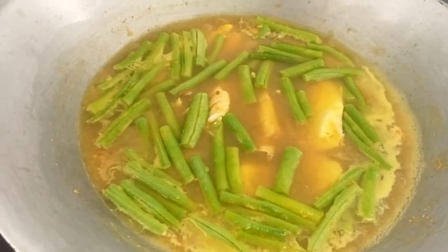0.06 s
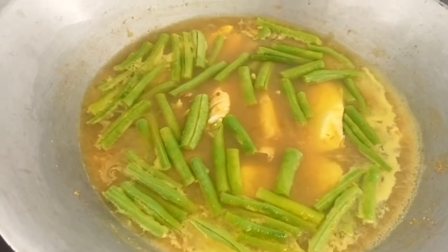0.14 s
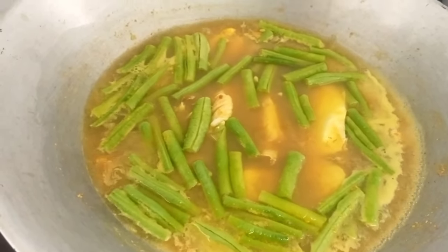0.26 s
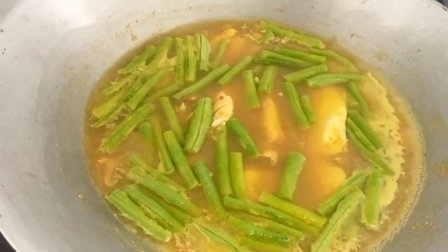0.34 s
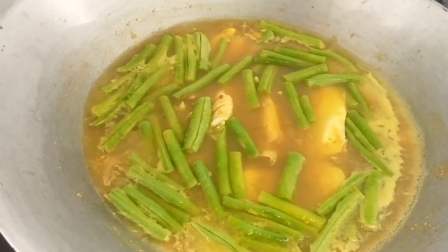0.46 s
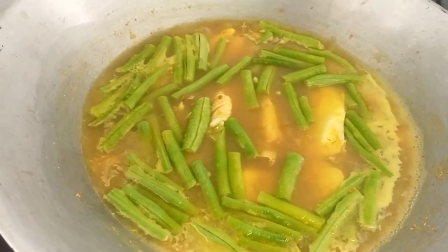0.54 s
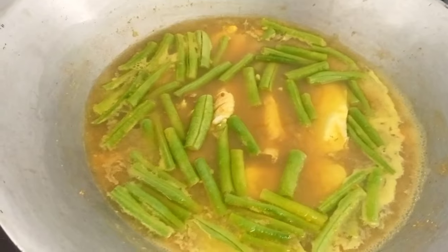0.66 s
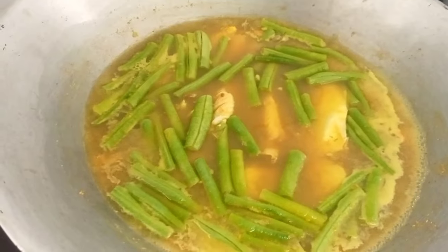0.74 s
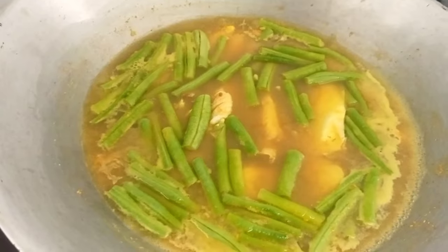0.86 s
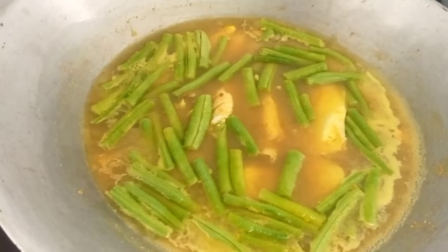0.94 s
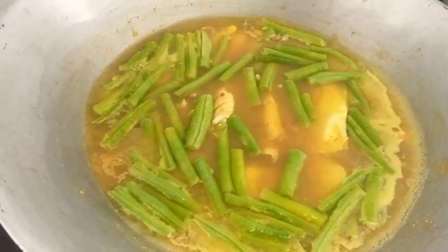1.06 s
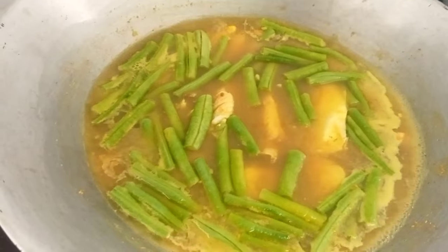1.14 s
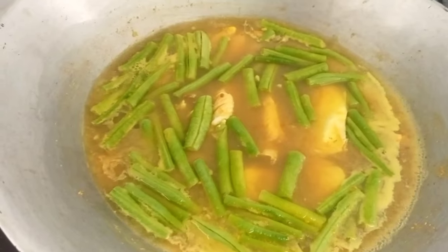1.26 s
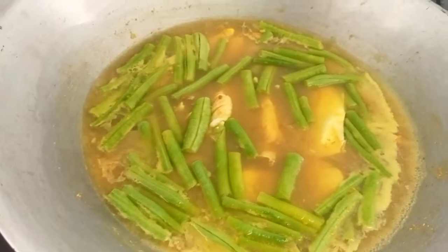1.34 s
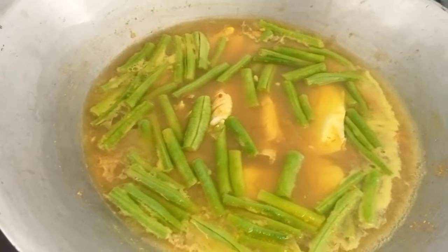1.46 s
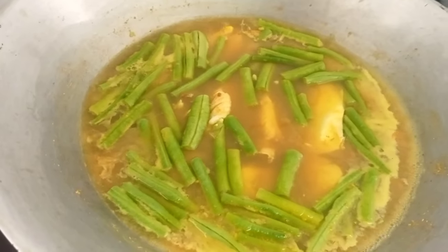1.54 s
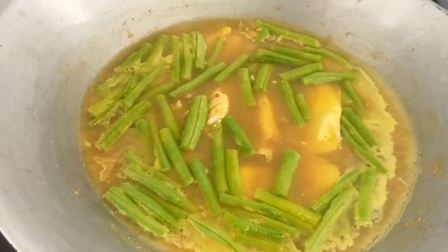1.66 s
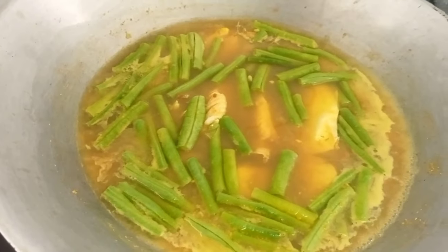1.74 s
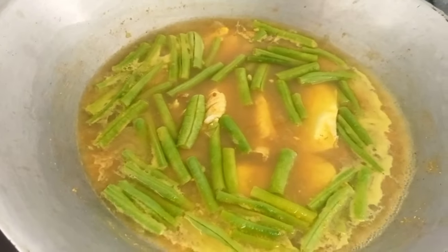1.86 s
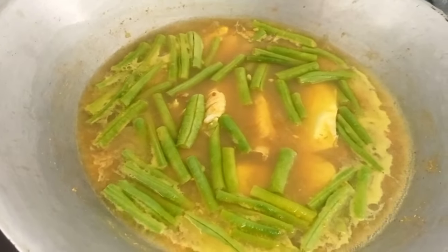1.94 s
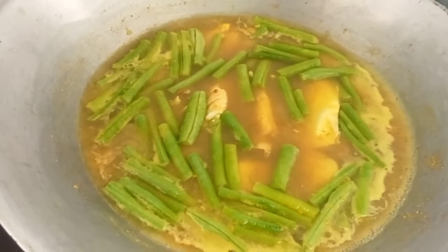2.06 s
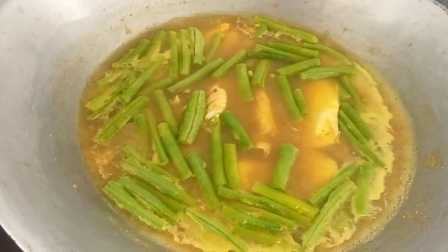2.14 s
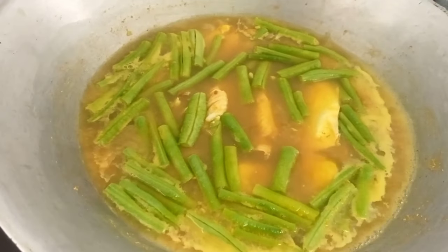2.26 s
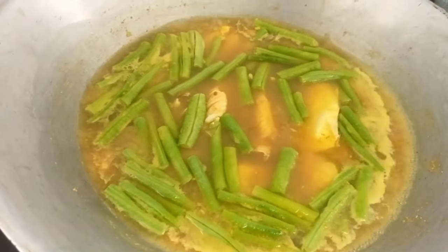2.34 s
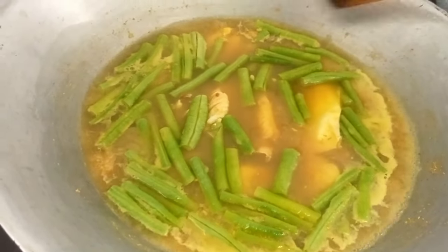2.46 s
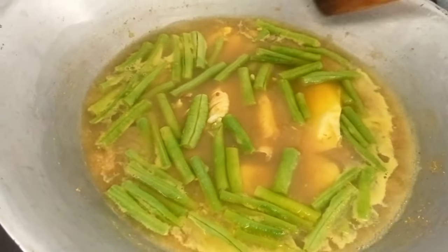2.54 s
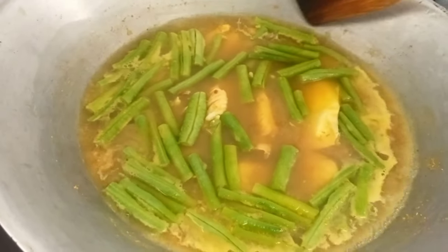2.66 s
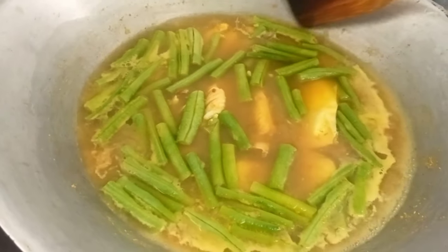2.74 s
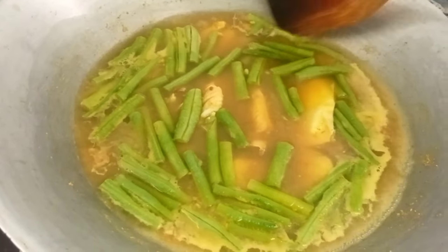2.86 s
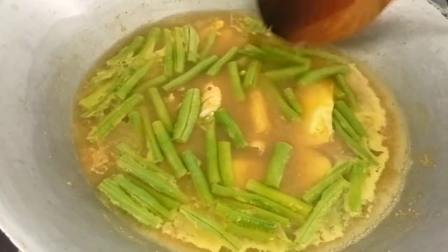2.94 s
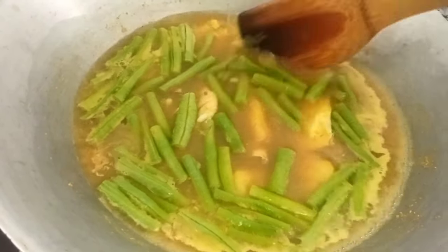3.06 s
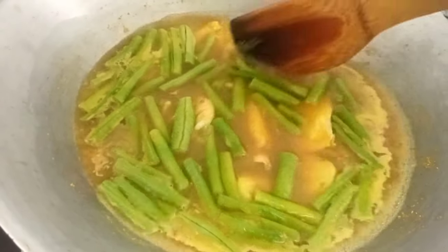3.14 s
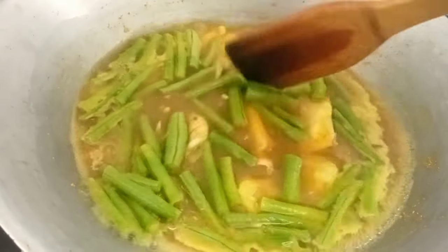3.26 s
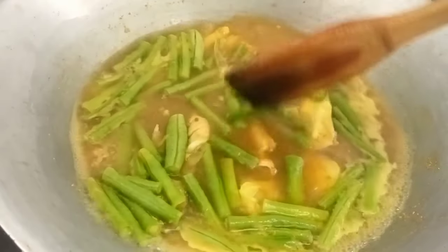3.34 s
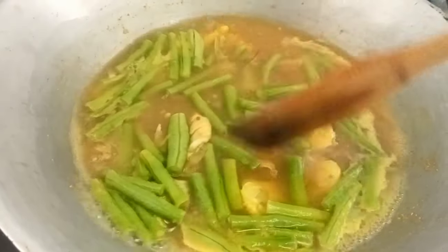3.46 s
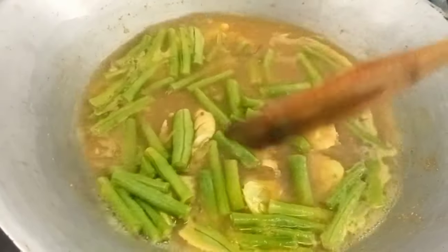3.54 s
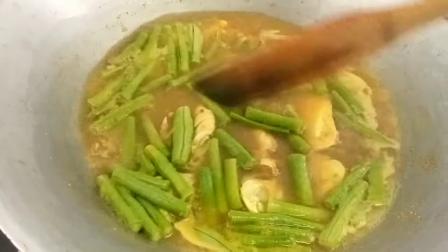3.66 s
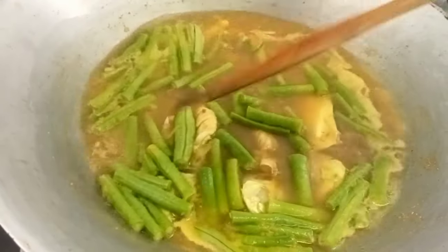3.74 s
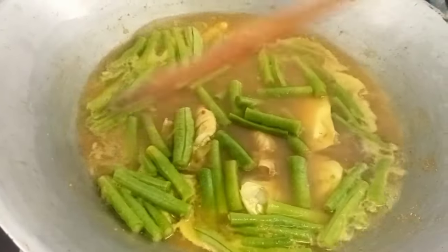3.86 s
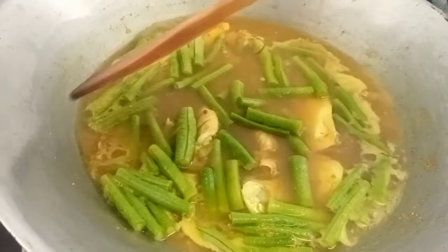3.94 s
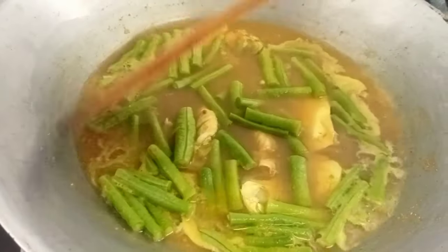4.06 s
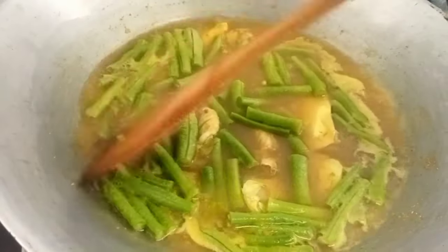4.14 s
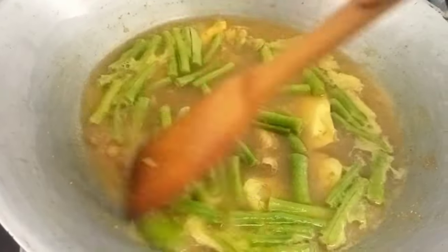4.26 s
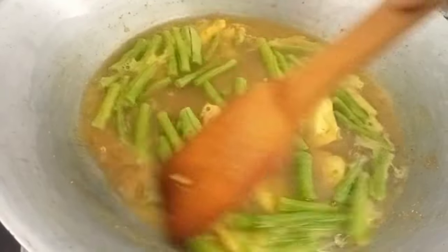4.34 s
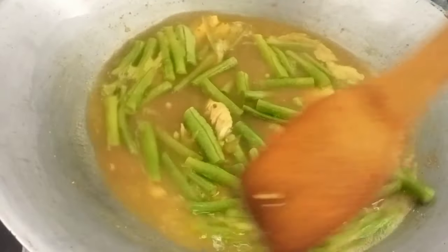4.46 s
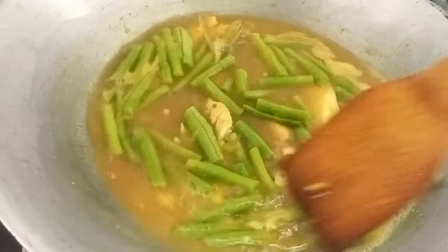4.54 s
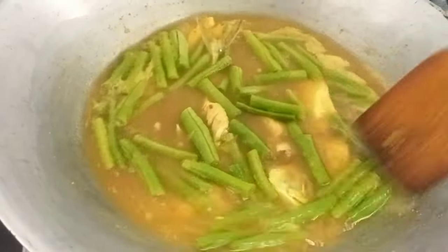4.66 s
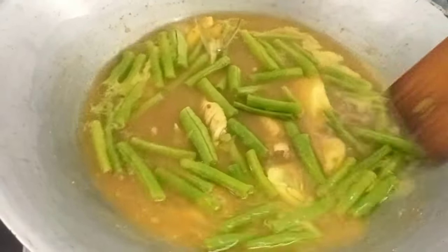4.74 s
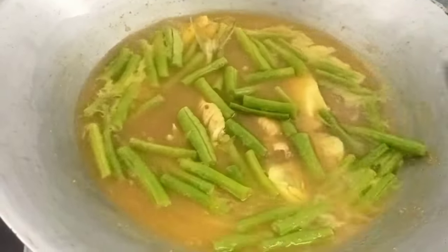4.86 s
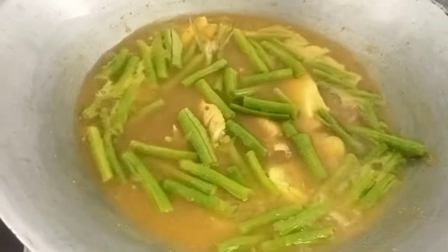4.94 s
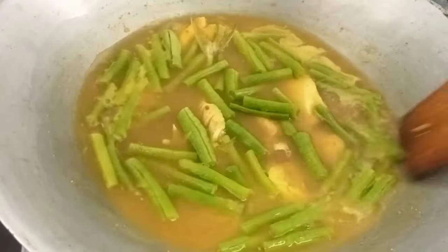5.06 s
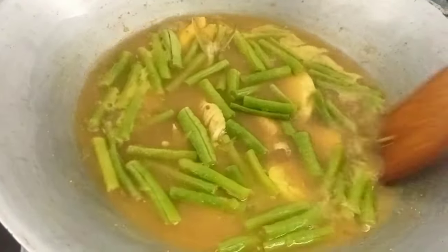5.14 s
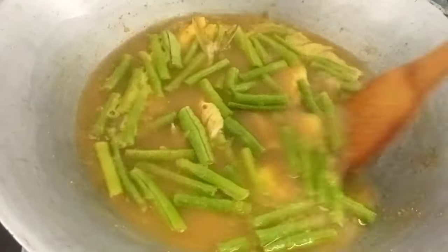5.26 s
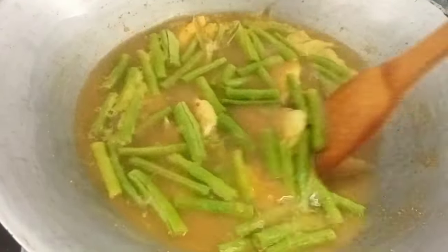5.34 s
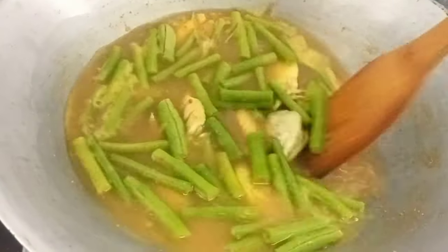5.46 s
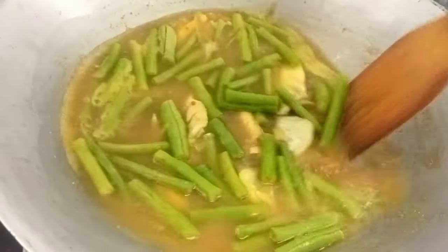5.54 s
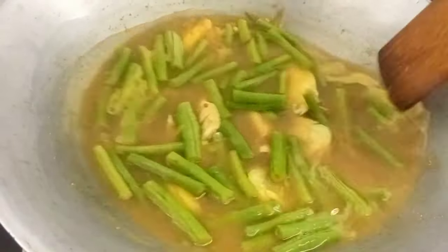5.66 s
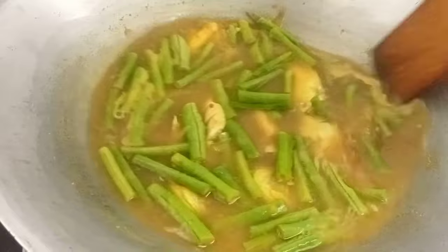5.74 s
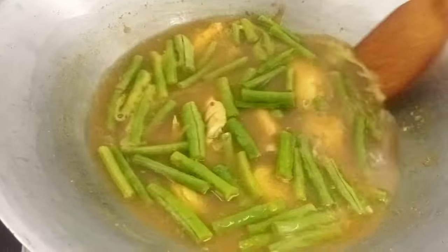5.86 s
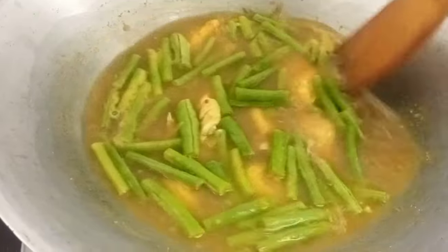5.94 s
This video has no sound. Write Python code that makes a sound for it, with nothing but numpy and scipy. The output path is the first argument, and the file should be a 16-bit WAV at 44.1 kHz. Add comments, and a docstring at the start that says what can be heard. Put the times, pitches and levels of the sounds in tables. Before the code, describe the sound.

Broth with green beans simmers in a metal wok, fizzing finely over the hiss and low rumble of a gas burner. After a soft swish, something is set down nearby with a rattling clunk. About halfway through, a wooden spatula starts scraping and bumping the wok, and broth washing up the hot wall flares into repeated sizzles, with a few small bubble pops. It is heard up close in a small kitchen.

```python
"""A small kitchen, close to a metal wok where broth with green beans simmers over a hissing gas burner.
Tiny bubbles fizz along the rim, a few bigger ones pop, and flame and broth rumble underneath.
After a soft swish, something is set down nearby with a rattling clunk. Then a wooden spatula scrapes
and bumps the wok, and each wave of broth that washes up the hot dry wall flashes into a sizzle."""
import sys
import numpy as np
from scipy import signal
from scipy.fft import rfft, irfft, next_fast_len
from scipy.io import wavfile
from scipy.ndimage import map_coordinates

SR = 44100
rng = np.random.default_rng(int(sys.argv[2]) if len(sys.argv) > 2 else 0)


def to_wav(s):
    """Save 16-bit WAV."""
    ch = np.atleast_2d(s).T  # columns
    pcm = np.round(np.clip(ch, -1, 1) * 32767)  # PCM
    wavfile.write(sys.argv[1], SR, pcm.astype(np.int16))


N = 265036

# Waves of broth on the hot wall. Each row: start, climb, stay and dry-off t60 in seconds, spray level
# in dB, spit and mist sends in dB from the spray, rim fizz lost to cooling in dB (negative is a lift).
WAVES = [(2.895, 0.18, 0.097, 0.91, -34.5, -9.5, -17, 4.5), (4.193, 0.02, 0.018, .4, -41.5, -7.5, -20, 5),
         (4.21, .11, 0.18, 1.05, -44.5, -7.5, -1.5, 2), (4.721, 0.012, 0.091, 0.43, -26, -9.5, -7, -0.5),
         (5.236, 0.015, .008, 0.17, -44.5, -5, 1, 4), (5.29, 0.086, 0.046, 1.28, -46.5, -7, -21, -13),
         (5.519, 0.032, 0.0097, 0.22, -49.5, -11, -1, 3)]
# EQ curves for fine spray, coarse spitting, the finest droplets and the foam at the rim.
# Each row: frequency in Hz, relative level in dB.
SPRAY_EQ = [(2500, -22), (4500, -15.5), (5800, -3), (7000, 0), (7900, 5), (9000, -2), (11500, -12),
            (15500, -10)]
SPIT_EQ = [(300, -18.5), (900, -18.5), (1280, -17), (1700, -14), (2050, -8), (2500, 2.5), (3100, -1),
           (3900, -6), (5500, -3.5), (9000, -32)]
MIST_EQ = [(7000, -42), (10000, 0), (12000, -2), (13500, 6), (15500, -3.5)]
FIZZ_EQ = [(880, -25.5), (1500, -16), (1930, -17), (2520, -8.5), (3120, -11), (3720, -17.5), (4660, -17),
           (5450, -13), (5950, -9.5), (6690, -7.5), (8050, -1), (9890, -12.5), (11400, -16), (13500, -9.5),
           (15500, -14.5)]
# Spatula hits on the wok; then the thing set down, which touches, lands, rocks back and gets a nudge.
# Each row: start in seconds, relative level in dB, hardness as a low-pass corner in Hz.
SPATULA_HITS = [(3.948, -28.5, 1040), (4.752, -27.5, 104), (5.03, -34, 130), (5.55, -38, 229)]
CLUNK_HITS = [(.4345, -31, 2430), (.4415, -29.5, 8000), (.492, -26.5, 336), (.96, -47, 3200)]
# The ring of the wok and of the thing set down, each with a low thump near 230 Hz, probably from the
# room or table. Each row: frequency in Hz, relative level in dB, t60 in seconds.
BUMP_MODES = [(131.4, -9, 1), (198.5, -7, 1.13), (227, 6.5, 0.1), (299, -6.5, 0.44), (359, -9, 0.17),
              (433, -6, 0.13), (647, -8.5, 0.087), (790, -18, 0.28), (881, -15.5, 0.27), (1220, -23, .08),
              (3170, -6, .04)]
CLUNK_MODES = [(142.5, -8, 0.68), (230, 6, 0.14), (346.6, -0.5, 0.096), (616, -5, 0.11), (685, -14, 0.4),
               (862, -22, 0.43), (1026, -8, 0.23), (1110, -11.5, 0.32), (1390, -33, .2), (1518, -5, 0.22),
               (1577, -5, 0.14), (2040, -19, 0.25), (2326, 1, 0.071), (2600, -12, .35), (3050, -16, 0.36),
               (3380, -14, 0.24), (4060, -8, .08), (5440, 8, 0.019), (5900, 2, 0.015)]
# Wood dragging over metal. Each row: start in seconds, length in seconds, level in dB.
SCRAPE_STROKES = [(2.954, 0.46, -54), (4.177, 0.1, -52), (4.27, 0.33, -56.5), (5.065, 0.073, -51.5),
                  (5.338, 0.09, -54.5), (5.53, 0.056, -52)]
# Resonances of the wall under the blade, the soft swish and the gas jet's whistle.
# Each row: centre in Hz, width in Hz, relative level in dB.
WALL_PEAKS = [(1260, 270, -7.5), (2300, 600, -7.5), (2740, 150, -8), (2970, 160, -5), (3870, 300, -14),
              (5170, 700, -12)]
SWISH_PEAKS = [(1400, 2200, -9.5), (3000, 180, -5), (3640, 300, -1), (4160, 400, -1), (5160, 800, -2)]
WHISTLE_PEAKS = [(7960, 110, 8), (8260, 170, 0)]
# Single bubbles bursting. Each row: start in seconds, relative level in dB, pitch in Hz, t60 in seconds.
BUBBLE_POPS = [(3.9294, -32, 2800, 0.0031), (4.085, -48.5, 1400, 0.0093), (4.376, -33.5, 1840, 0.0029),
               (5.081, -54, 3130, 0.03), (5.173, -33, 3000, 0.003), (5.841, -45, 2690, 0.0045)]
# EQ curves for the gas hiss and the flame's rumble. Each row: frequency in Hz, relative level in dB.
JET_EQ = [(600, -13), (1800, -3), (2480, 7.5), (3000, 0), (4200, -3), (7000, 0.5), (8200, 8), (10500, -33),
          (13500, -30), (15500, 4)]
FLAME_EQ = [(20, -34), (40, -10), (60, -4), (120, -1), (190, -1.5), (260, -8.5), (350, -7.5), (450, -12),
            (650, -13.5), (1000, -20), (1250, -19), (2000, -34), (3000, -35)]
# The kitchen's reverb. Each row: frequency in Hz, t60 in seconds.
KITCHEN_DECAY = [(150, 0.11), (400, 0.66), (1500, 0.5), (5000, 1), (14000, 0.13)]


def sizzle(sag_db_per_s=7.5, spit_lag_s=0.024):
    """Each wave climbs the hot wall, thins and dries off, boiling into spray, mist and coarse spit."""
    spit, spray, mist = np.zeros((3, N))
    t = np.arange(N) / SR
    growth = 1 - np.exp(-1 / (spit_lag_s * SR))  # big bubbles take time to grow, so the spit comes late
    for start, climb, stay, t60, spray_db, spit_db, mist_db, _ in WAVES:
        top = start + climb
        thinning_db = sag_db_per_s * np.clip(t - top, 0, stay)
        drying_db = 60 * np.maximum(t - top - stay, 0) / t60
        boiling = ramp(start, climb) * amp(spray_db - thinning_db - drying_db)
        spray += boiling
        mist += amp(mist_db) * boiling
        spit += amp(spit_db) * signal.lfilter([growth], [1, growth - 1], boiling)
    coarse = spit * crackle(SPIT_EQ, per_s=1800, spread_db=2, steam_db=1.5)
    fine = spray * amp(-1.4) * crackle(SPRAY_EQ, per_s=4600, spread_db=-0.5, steam_db=10.5)
    finest = mist * amp(-1.5 + 0.7 * wobble(35)) * crackle(MIST_EQ, per_s=5600, spread_db=8, steam_db=0)
    return (coarse + fine + finest) * amp(0.65 * wobble(60))


def simmer(settle_db_per_s=0.34, cooling_s=0.47, reheat_s=2.4):
    """Foam fizzes and flurries at the rim; most waves leave it cooler and quieter, two lift it."""
    t = np.arange(N) / SR
    level_db = -46.5 - settle_db_per_s * t
    for start, climb, stay, t60, *_, lost_db in WAVES:
        drained = start + climb + stay + 0.32 * t60  # about a third into the dry-off
        chill = ramp(drained, cooling_s) * np.exp(-np.maximum(t - drained - cooling_s, 0) / reheat_s)
        level_db -= lost_db * chill
    flicker = amp(0.04 + wobble(15) + 1.07 * wobble(70))
    fizz = flicker * crackle(FIZZ_EQ, per_s=2500, spread_db=-1.5, steam_db=1.5)
    flurries = amp(-10.5 + 2.6 * wobble(20)) * crackle(MIST_EQ, per_s=700, spread_db=5, steam_db=-6)
    return amp(level_db) * (fizz + flurries)


def spatula_bumps():
    """Wood knocks and chatters against the full wok, setting off a ring and a low thump."""
    hits = rebounds(SPATULA_HITS, gap_s=0.024, loss_db=1.5, softening=0.69)
    return strikes(hits, BUMP_MODES, crack_db=0.5, crack_t60=0.04, crack_hz=4000)


def spatula_scrapes(slips_per_s=900):
    """The blade catches and slips, ringing the wall under each stroke."""
    pressure = np.zeros(N)
    for start, length, db in SCRAPE_STROKES:
        add(pressure, start, amp(db) * signal.windows.tukey(round(length * SR), 0.6))
    slips = rng.standard_normal(N) * (rng.random(N) < slips_per_s / SR)
    return pressure * resonate(slips, WALL_PEAKS)


def clunk():
    """Something is set down and rattles, with a ring and a low thump at each contact."""
    hits = rebounds(CLUNK_HITS, gap_s=0.022, loss_db=2.5, softening=0.35)
    return strikes(hits, CLUNK_MODES, crack_db=-3, crack_t60=0.51, crack_hz=3350)


def pops():
    """Each bursting bubble rings as a tiny sine blip."""
    track, t = np.zeros(N), np.arange(SR // 20) / SR
    attack = 1 - np.exp(-t / 0.00038)
    for start, db, hz, t60 in BUBBLE_POPS:
        add(track, start, attack * amp(db + 9.5 - 60 * t / t60) * np.sin(2 * np.pi * hz * t))
    return track


def swish(start=0.025, level_db=-48, t60=1.0):
    """A soft swish of noise comes in quickly and fades."""
    t = np.maximum(np.arange(N) / SR - start, 0)
    envelope = amp(level_db - 60 * t / t60) * (1 - np.exp(-t / 0.0047))
    return envelope * resonate(rng.standard_normal(N), SWISH_PEAKS)


def burner():
    """The gas jet hisses, with a whistle in two narrow bands that wavers in level."""
    whistle = resonate(rng.standard_normal(N), WHISTLE_PEAKS) * amp(-54.5 + 0.3 * wobble(10))
    hiss = amp(-56) * equalise(rng.standard_normal(N), JET_EQ)
    return whistle + hiss


def rumble():
    """Flame and rolling broth lay down a low, lumpy bed."""
    return amp(-54 + 1.8 * wobble(15)) * equalise(rng.standard_normal(N), FLAME_EQ)


def bowl(x, t60, echo_db):
    """Sound bounces around the metal bowl and picks up a fine comb colour."""
    t = np.arange(SR // 10) / SR
    echoes = lowpass(rng.standard_normal(len(t)) * amp(-60 * t / t60), corner_hz=8600)
    response = (t == 0) + amp(echo_db) * echoes / np.linalg.norm(echoes)
    return signal.fftconvolve(x, response / np.linalg.norm(response))[:N]


def kitchen(x, wet_db):
    """Adds reverb off hard walls; the lows and the very top die first."""
    hz, t, noise = signal.stft(rng.standard_normal(SR // 2), SR, nperseg=256)
    decay = amp(-60 * t / curve_at(KITCHEN_DECAY, hz)[:, None])
    tail = signal.istft(noise * decay, SR, nperseg=256)[1]
    response = np.pad(tail, (SR // 200, 0)) / np.linalg.norm(tail)  # 5 ms pre-delay
    return x + amp(wet_db) * signal.fftconvolve(x, response)[:N]


def crackle(eq, per_s, spread_db, steam_db):
    """Tiny bubbles of uneven size burst at random over a smooth hiss of steam."""
    sizes = amp(spread_db * np.minimum(rng.standard_normal(N), 2)) * rng.choice([-1, 1], N)
    bursts = unit_rms(sizes * (rng.random(N) < per_s / SR))
    return equalise(bursts + amp(steam_db) * rng.standard_normal(N), eq)


def rebounds(hits, gap_s, loss_db, softening):
    """Each hit lands twice, the bounce weaker and duller."""
    return [(start + k * gap_s, db - k * loss_db, corner_hz * softening ** k)
            for start, db, corner_hz in hits for k in range(2)]


def strikes(hits, modes, crack_db, crack_t60, crack_hz):
    """Each hit rings the modes in a fresh balance over a crack of noise; soft hits lack treble."""
    track, t = np.zeros(N), np.arange(SR * 3 // 4) / SR
    hz, mode_db, t60 = np.transpose(modes)[:, :, None]
    crack_band = signal.butter(3, [130, crack_hz], "band", fs=SR, output="sos")
    attack = 1 - np.exp(-t / 0.00047)
    for start, db, corner_hz in hits:
        detune, phase, scatter_db = rng.standard_normal((3, len(modes), 1))
        partials = np.sin(2 * np.pi * (hz * (1 + 0.0104 * detune) * t + phase))
        ring = amp(mode_db + scatter_db - 60 * t / t60) * partials
        noise = signal.sosfilt(crack_band, rng.standard_normal(len(t)))
        crack = amp(crack_db - 60 * t / crack_t60) * noise
        add(track, start, amp(db) * lowpass(attack * (ring.sum(0) / 2 + crack), corner_hz))
    return track


def amp(db):
    """Decibels to gain."""
    return 10 ** (np.asarray(db) / 20)


def unit_rms(x):
    """Normalises x to rms 1."""
    return x / np.sqrt(np.mean(x ** 2) + 1e-20)


def curve_at(points, hz):
    """Reads (Hz, value) points on a log frequency axis."""
    knots_hz, values = np.transpose(points)
    return np.interp(np.log(hz + 1), np.log(knots_hz + 1), values)


def wobble(per_s):
    """A smooth random modulator with per_s knots a second."""
    return map_coordinates(rng.standard_normal(int(N * per_s / SR) + 4), [np.arange(N) * per_s / SR])


def ramp(start, length):
    """Fades from 0 to 1 over length seconds after start."""
    return np.clip((np.arange(N) / SR - start) / max(length, 1 / SR), 0, 1)


def add(track, start, sound):
    """Mixes a sound into the track at start seconds."""
    part = track[round(start * SR):][:len(sound)]
    part += sound[:len(part)]


def filtered(x, gain_at):
    """Applies a gain that depends on frequency."""
    size = next_fast_len(len(x) + SR // 4)
    return irfft(rfft(x, size) * gain_at(np.fft.rfftfreq(size, 1 / SR)), size)[:len(x)]


def equalise(x, eq):
    """x through an EQ curve, at rms 1."""
    return unit_rms(filtered(x, lambda hz: amp(curve_at(eq, hz))))


def resonate(x, peaks):
    """x through a bank of resonant peaks, at rms 1."""
    def gain_at(hz):
        return sum(amp(db) / (1 + ((hz - centre) / (width / 2)) ** 2) for centre, width, db in peaks)
    return unit_rms(filtered(x, gain_at))


def lowpass(x, corner_hz):
    """Rolls off the treble at 12 dB per octave."""
    return signal.lfilter(*signal.butter(2, min(corner_hz, SR / 3), fs=SR), x)


def scene():
    """A mono mix: the broth sits close in its bowl; knocks and pops get the kitchen reverb."""
    knocks = kitchen(clunk(), wet_db=-9) + kitchen(spatula_bumps(), wet_db=-9)
    broth = bowl(simmer() + sizzle(), t60=0.1, echo_db=-10.5)
    bed = burner() + rumble()
    mono = broth + knocks + bed + kitchen(pops(), wet_db=-4.5) + swish() + spatula_scrapes()
    return np.array([mono, mono])


def record(dry, low_cut_hz=48, top_hz=15520):
    """Master EQ: a low cut sheds the deep bass and a brick wall takes off the very top."""
    thinned = signal.lfilter(*signal.butter(4, low_cut_hz, "high", fs=SR), dry)
    return np.array([filtered(channel, lambda hz: hz < top_hz) for channel in thinned])


dry = scene()
out = record(dry)
to_wav(out)
```